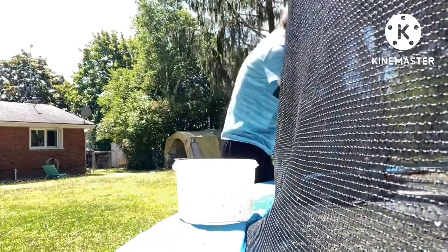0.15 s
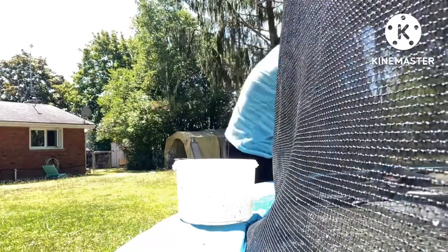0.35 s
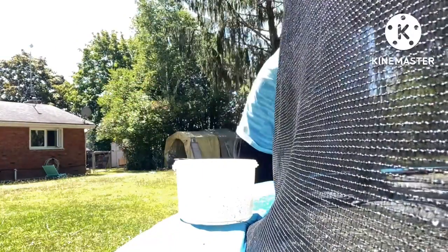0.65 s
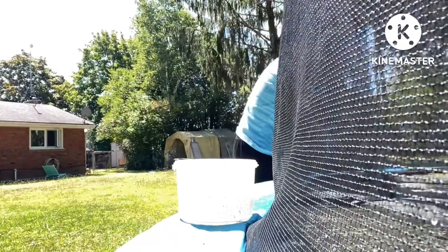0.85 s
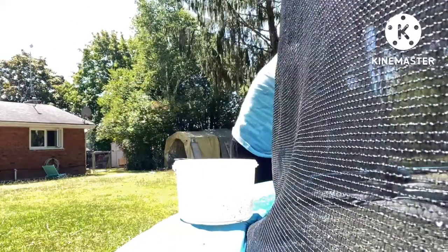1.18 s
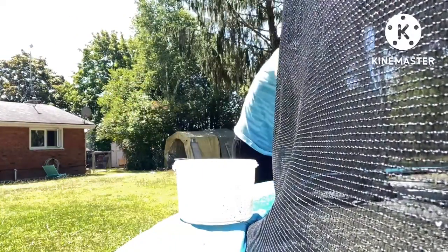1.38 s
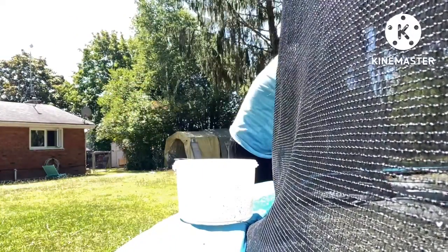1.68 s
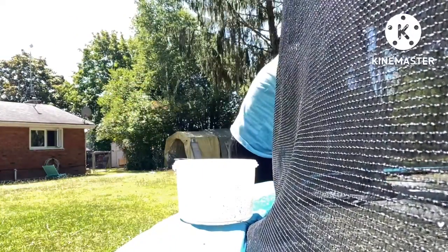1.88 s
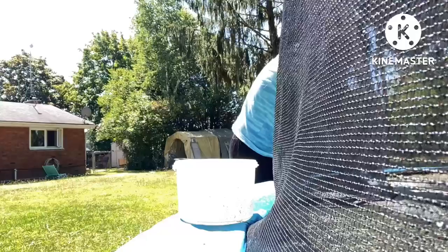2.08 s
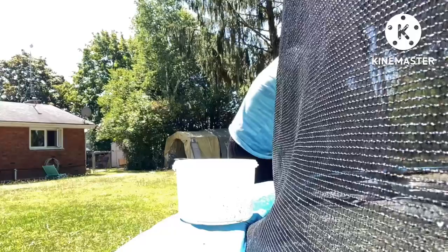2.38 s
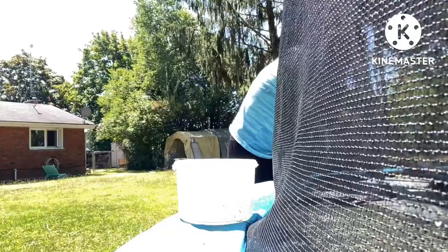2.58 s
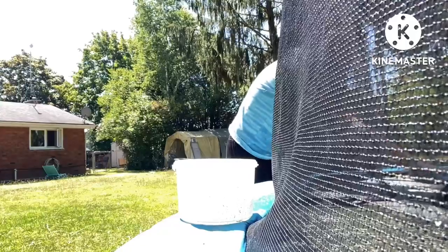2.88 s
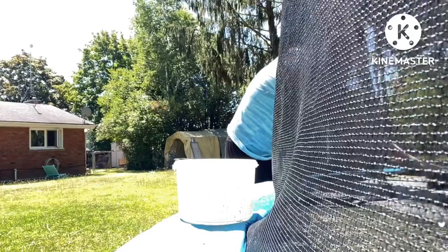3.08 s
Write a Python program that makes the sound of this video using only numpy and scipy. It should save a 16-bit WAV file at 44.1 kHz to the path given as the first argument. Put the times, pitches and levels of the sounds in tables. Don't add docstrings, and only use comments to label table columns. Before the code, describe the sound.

A stiff wet brush scrubs a taut woven mat, close and slightly right, dry-sounding outdoors. Grainy scratchy strokes alternate until 2.4 s: fuller, drumming pushes near 0.2, 0.9, 1.6 and 2.2 s, lighter pulls between. Soft low thuds come at 2.3 and 2.45 s. A long brighter sweep ends in crackling flicks at 2.65-2.75 s, then thinner rinsing strokes from 2.85 s. Distant traffic slowly fades; leaves rustle very faintly.

```python
import sys
import numpy as np
from scipy import signal
from scipy.fft import rfft, irfft
from scipy.io import wavfile
from scipy.ndimage import uniform_filter1d, map_coordinates

SR = 44100
rng = np.random.default_rng(int(sys.argv[2]) if len(sys.argv) > 2 else 0)


def nominal_scale(level):
    x = np.asarray(level, float) / 20
    return 10 ** x


def master(y):
    cut = np.clip(np.atleast_2d(y).T, -1, 1)
    pcm = np.round(cut * 32767)
    wavfile.write(sys.argv[1], SR, pcm.astype(np.int16))


N = 143325


def rms_one(x):
    return x / np.sqrt(np.mean(x ** 2) + 1e-20)


def in_time(rows, outside=None):
    seconds, values = np.transpose(rows)
    return np.interp(np.arange(N) / SR, seconds, values, left=outside, right=outside)


def frequencies():
    return np.arange(N // 2 + 1) * SR / N


def colour(x, points):
    hz = np.maximum(frequencies(), 1)
    f, db = np.transpose(points)
    gain = nominal_scale(np.interp(np.log(hz), np.log(f), db))
    gain = gain * (hz > f[0] / 3)
    return irfft(rfft(x) * gain, N)


def delay(x, ms):
    return map_coordinates(x, [np.arange(N) - ms * SR / 1000], order=3, mode="nearest")


def drift(rate_hz):
    r = np.exp(-2 * np.pi * rate_hz / SR)
    noise = rng.standard_normal(N + SR)
    return rms_one(signal.lfilter([1], [1, -2 * r, r * r], noise)[SR:])


def snaps():
    snaps_per_s, spread_db, clump_db, clump_hz = 12000, 0.5, 0.5, 41.3
    sizes = nominal_scale(spread_db * np.minimum(rng.exponential(1, N), 5)) * rng.choice([-1, 1], N)
    clicks = sizes * (rng.random(N) < snaps_per_s / SR)
    return rms_one(clicks) * nominal_scale(clump_db * drift(clump_hz))


def strokes(source):
    # t/s, level/dB
    pushes = [
        [(0.16, -37), (0.222, -28), (0.34, -32), (0.398, -42.5), (0.414, -69), (0.44, -58)],
        [(0.76, -71), (0.798, -40.5), (0.85, -27), (0.95, -26.5), (1.038, -33), (1.11, -60)],
        [(1.45, -69), (1.518, -30), (1.556, -28), (1.694, -30.5), (1.732, -37), (1.78, -67)],
        [(2.05, -64), (2.132, -33), (2.218, -27.5), (2.324, -40.5), (2.36, -51), (2.4, -69)],
    ]
    pulls = [
        [(0.0, -71), (0.04, -67), (0.05, -47.5), (0.118, -34.5), (0.172, -40.5), (0.19, -45)],
        [(0.44, -58), (0.576, -31.5), (0.668, -34.5), (0.728, -46.5), (0.742, -67), (0.77, -66)],
        [(1.11, -68), (1.186, -45.5), (1.208, -31.5), (1.302, -30.5), (1.378, -36.5), (1.46, -66)],
        [(1.78, -57), (1.884, -35.5), (1.974, -33), (2.022, -46.5), (2.042, -66), (2.06, -40)],
    ]
    sweep = [
        [(2.38, -57), (2.47, -34.5), (2.53, -30.5), (2.728, -33.5), (2.748, -48), (2.762, -67), (2.79, -62)],
    ]
    rinses = [
        [(2.8, -58), (2.838, -64), (2.884, -34), (2.92, -30.5), (3.106, -39.5), (3.18, -53)],
        [(3.16, -44), (3.17, -54), (3.178, -83), (3.182, -47), (3.25, -37.5)],
    ]
    # f/Hz, level/dB per Hz
    push_tone = [(250, -12), (800, 3), (1500, 3.5), (2600, -2), (4000, 0), (5500, -2), (7800, -.5),
                 (15000, -7.5)]
    pull_tone = [(250, -17), (800, -4), (1500, 0), (2600, -2), (4000, -.5), (5500, -2.5), (7800, -1),
                 (15000, -6.5)]
    sweep_tone = [(250, -21), (800, -1.5), (1500, -2), (2600, -3), (4200, -2.5), (7800, -2), (10500, -4),
                  (15000, -8.5)]
    rinse_tone = [(250, -26), (800, -0.5), (1500, -7), (2800, -5), (4600, -6), (7800, -7), (10500, -5.5),
                  (15000, -15.5)]
    kinds = [(pushes, push_tone), (pulls, pull_tone), (sweep, sweep_tone), (rinses, rinse_tone)]
    out = 0
    for tables, tone in kinds:
        speed = sum(nominal_scale(in_time(rows, outside=-120)) for rows in tables)
        speed = uniform_filter1d(speed, size=441)
        out = out + speed * rms_one(colour(source, tone))
    return nominal_scale(3.3) * out


def tips():
    # t/s, level/dB
    tip_swell = [(2.5, -56), (2.62, -27.5), (2.72, -27.5), (2.745, -29.5), (2.765, -77)]
    # f/Hz, level/dB per Hz
    tip_tone = [(3000, -24), (8000, -15.5), (11000, -13), (15000, -16)]
    return nominal_scale(in_time(tip_swell, outside=-120)) * rms_one(colour(snaps(), tip_tone))


def flicks():
    # t/s, peak level/dB
    cracks = [
        (2.648, -15),
        (2.675, -14),
        (2.688, -13),
        (2.702, -16),
        (2.713, -15),
        (2.72, -16),
        (2.726, -14),
        (2.733, -18),
        (2.743, -19),
        (2.75, -19),
    ]
    lowest_hz, level_db = 4000, -5.0
    step = np.arange(12)
    swing = (-1) ** (step // 2)
    out = np.zeros(N)
    for s, db in cracks:
        out[int(s * SR) + step] += nominal_scale(db + level_db - 1.8 * step) * swing
    high_pass = signal.butter(2, lowest_hz, "high", fs=SR, output="sos")
    return signal.sosfilt(high_pass, out + 1e-18)


def brush():
    # t/s, delay/ms
    left_lag = [(0.0, .24), (0.3, .245), (0.82, .225), (0.97, .268), (1.06, .24), (1.25, .255), (1.36, .23),
                (1.6, .218), (2.2, .225), (2.5, .26), (2.72, .318), (2.9, .324), (3.0, .305), (3.25, .28)]
    # f/Hz, level/dB
    left_shade = [(200, -3), (1600, -2), (2100, -.3), (3000, -.3), (4000, -3), (6500, -3)]
    # f/Hz, level/dB
    scatter_tone = [(300, 8), (1400, 6), (2000, -6), (3000, -6), (3800, 10), (6500, 11)]
    left_turn_rad, scatter_db = 0.4, -17.0
    right = strokes(snaps()) + flicks() + tips()
    late = delay(right, in_time(left_lag))
    late = irfft(rfft(late) * np.exp(1j * left_turn_rad), N)
    scattered = nominal_scale(scatter_db) * colour(strokes(rng.standard_normal(N)), scatter_tone)
    return np.array([colour(late + scattered, left_shade), right])


def bumps():
    # t/s, peak level/dB
    hits = [
        (2.324, -18),
        (2.452, -22),
    ]
    thud_hz, t60_s, rise_s = 68, 0.09, 0.0027
    out = 0
    for s, db in hits:
        age = np.maximum(np.arange(N) / SR - s, 0)
        fade = nominal_scale(db - 60 * age / t60_s) * (1 - np.exp(-age / rise_s))
        out = out + fade * np.sin(2 * np.pi * thud_hz * age)
    return out


def road(spectrum, swell_db):
    # f/Hz, level/dB
    diffuse = [(30, -5), (80, -6), (160, -9), (320, -3), (750, -7), (3000, -3)]
    lead_ms, left_db, patch_db, patch_hz = 0.47, -1.5, 0.7, 4.04
    direct, left, right = [rms_one(colour(rng.standard_normal(N), spectrum)) for _ in range(3)]
    both = np.array([direct, delay(direct, lead_ms)])
    both = both + colour(np.array([left, right]), diffuse)
    octave = np.log2(np.maximum(frequencies(), 1) / 30)
    out = 0
    for k in range(0, 10, 2):
        band = irfft(rfft(both) * np.clip(1 - abs(octave - k) / 2, 0, 1), N)
        out = out + nominal_scale(patch_db * drift(patch_hz)) * band
    return nominal_scale(swell_db) * rms_one(out) * nominal_scale([[left_db], [0]])


def scene():
    # f/Hz, level/dB per Hz
    engine_tone = [(28, -12.5), (62, 4), (110, -0.5), (165, -3), (260, -13.5), (380, -13), (600, -22),
                   (2000, -35.5)]
    tyre_tone = [(300, -17), (520, -9), (780, 0), (1050, -4), (1600, -13), (2400, -21), (5000, -36)]
    leaf_tone = [(1500, -3), (3500, 0), (6000, -4.5), (8200, -1.5), (10000, -10), (15000, -13)]
    # t/s, level/dB
    engine_swell = [(0.0, -28), (0.35, -29.5), (0.9, -29.5), (1.5, -31), (2.3, -33), (3.25, -34)]
    tyre_swell = [(0.0, -29.5), (0.45, -32), (1.0, -32), (1.8, -33), (2.4, -36), (2.75, -34), (3.25, -35)]
    engines = road(engine_tone, in_time(engine_swell))
    tyres = road(tyre_tone, in_time(tyre_swell))
    leaves = road(leaf_tone, -51)
    return brush() + bumps() + engines + tyres + leaves


def top_cut(x):
    return signal.sosfilt(signal.butter(12, 15670, fs=SR, output="sos"), x)


def record(dry):
    split_hz, split_width_hz, lead_ms, dwell_rad = 6750, 300, 0.1915, 0.25
    hz = frequencies()
    high = 1 / (1 + np.exp(-(hz - split_hz) / split_width_hz))
    turn = 2 * np.pi * hz * lead_ms / 1000
    turn = turn + dwell_rad * np.sin(2 * turn + np.pi)
    left, right = rfft(dry)
    left = left * (1 - high) - right * high * np.exp(1j * turn)
    x = np.array([irfft(left, N), dry[1]])
    low_pass = signal.cheby2(10, 40, 16100, fs=SR, output="sos")
    return top_cut(signal.sosfiltfilt(low_pass, x))


dry = scene()
out = record(dry)
master(out)
```